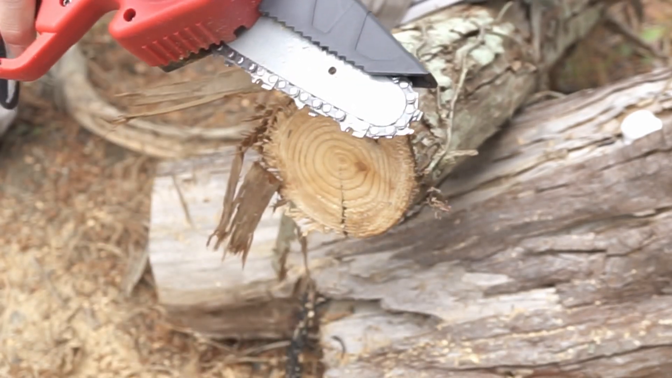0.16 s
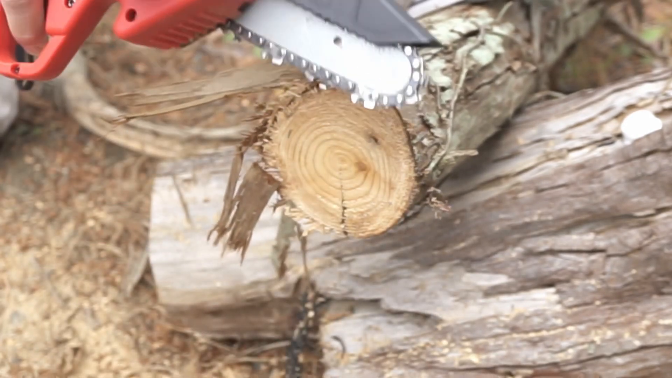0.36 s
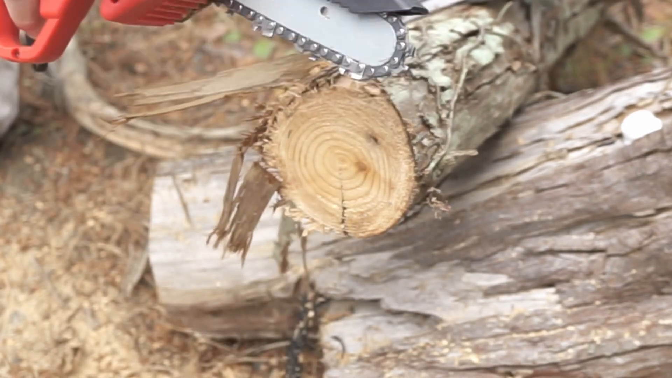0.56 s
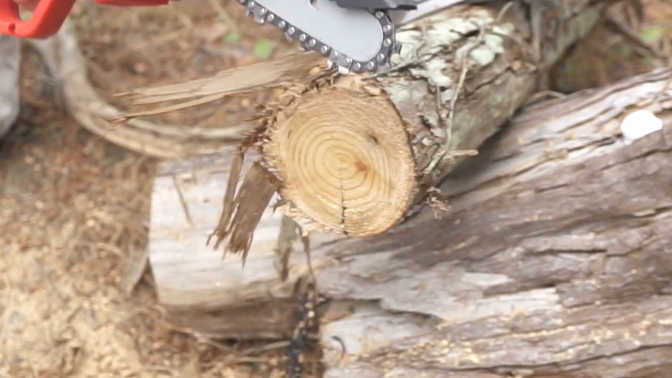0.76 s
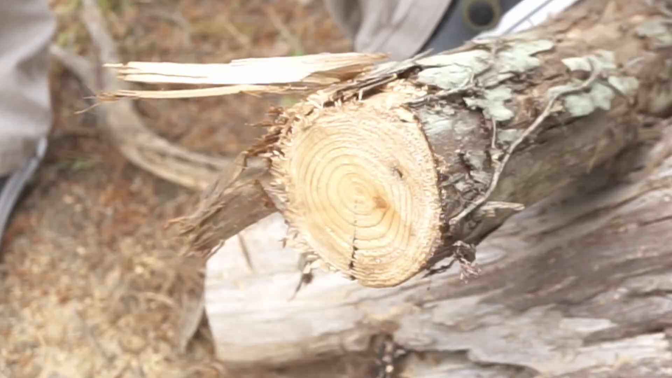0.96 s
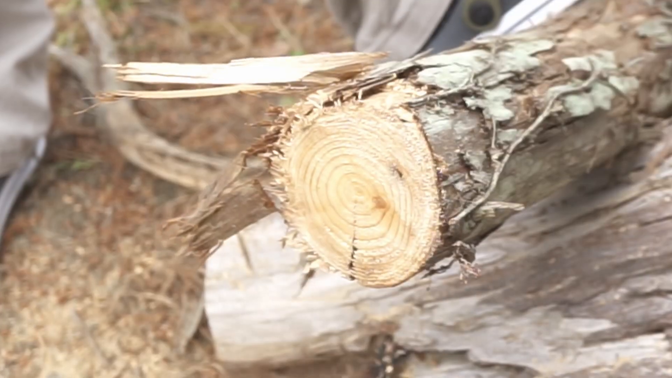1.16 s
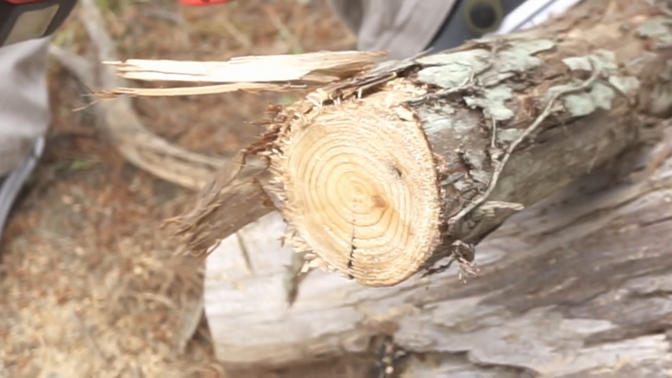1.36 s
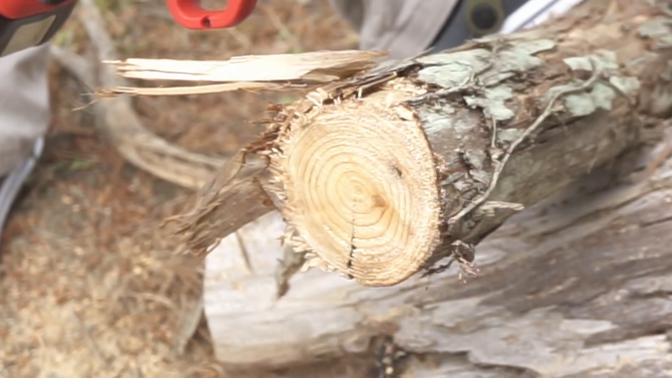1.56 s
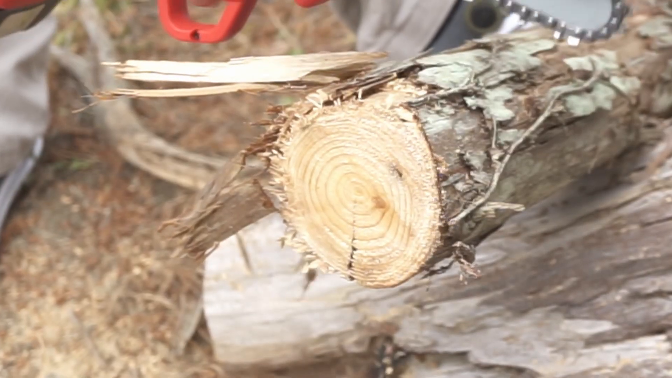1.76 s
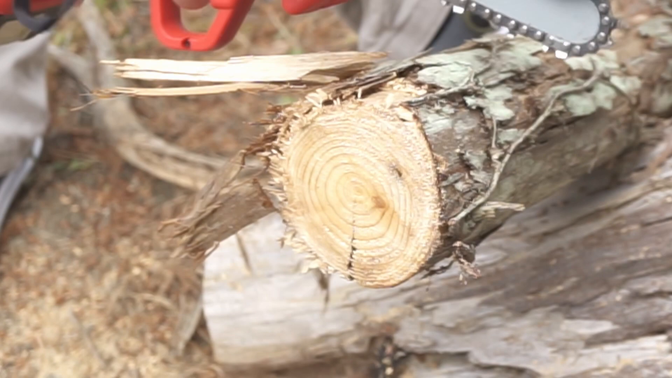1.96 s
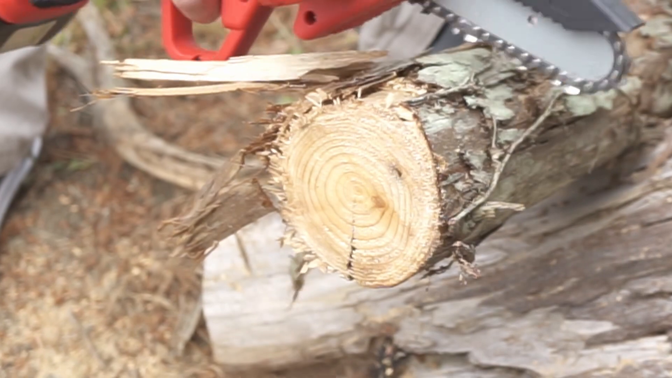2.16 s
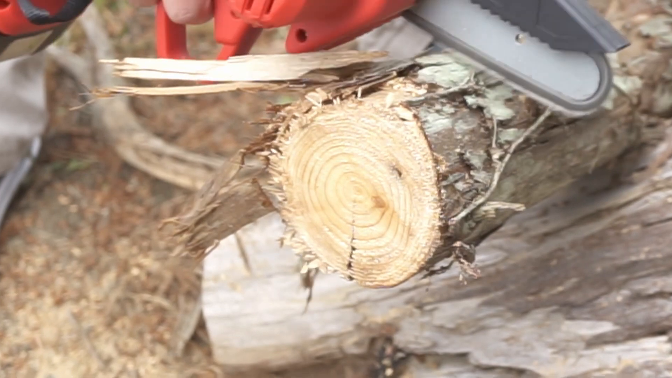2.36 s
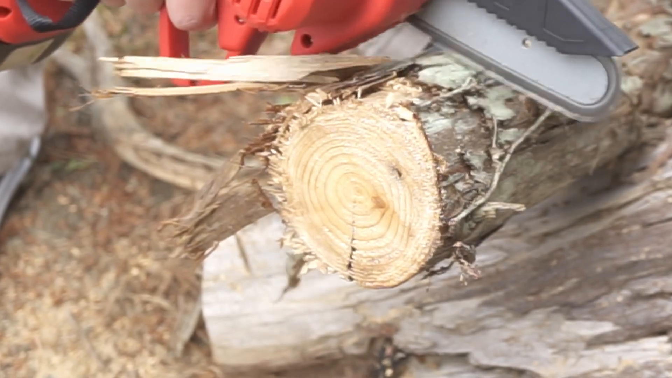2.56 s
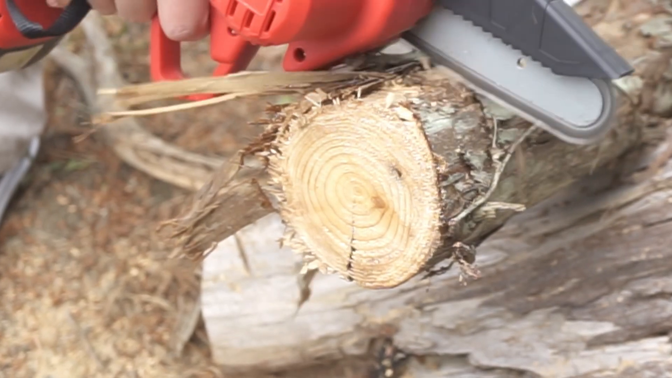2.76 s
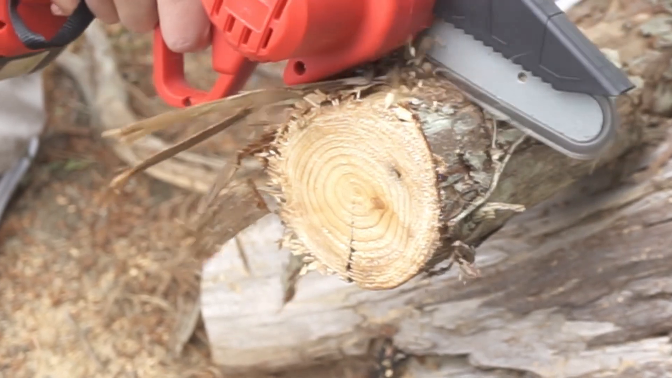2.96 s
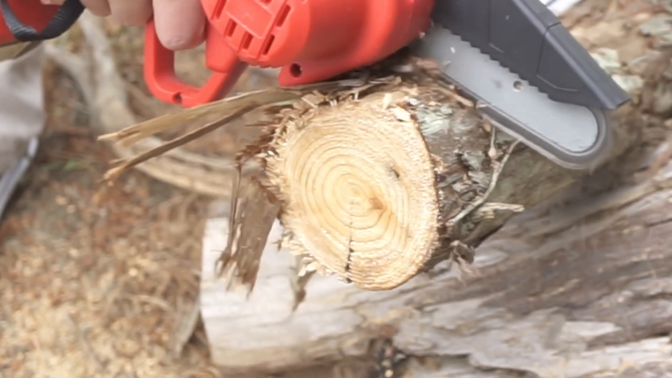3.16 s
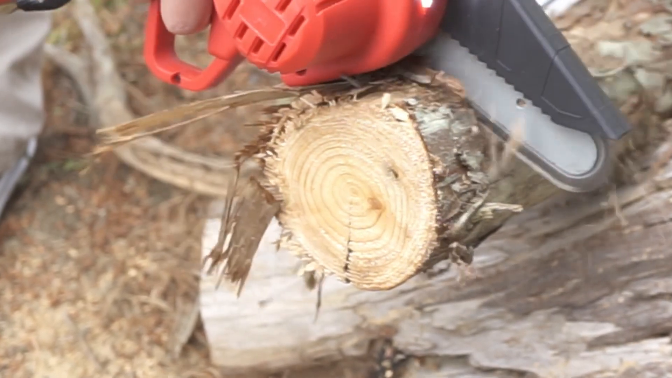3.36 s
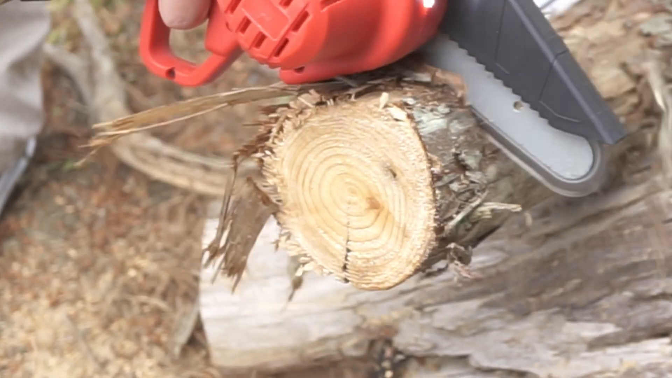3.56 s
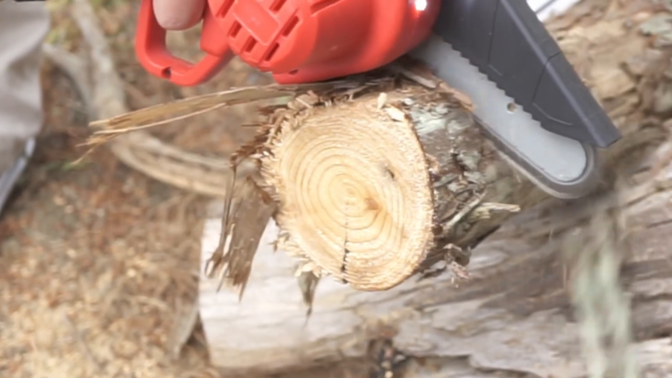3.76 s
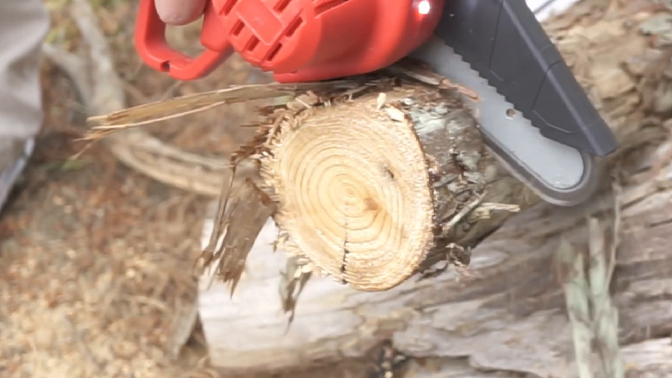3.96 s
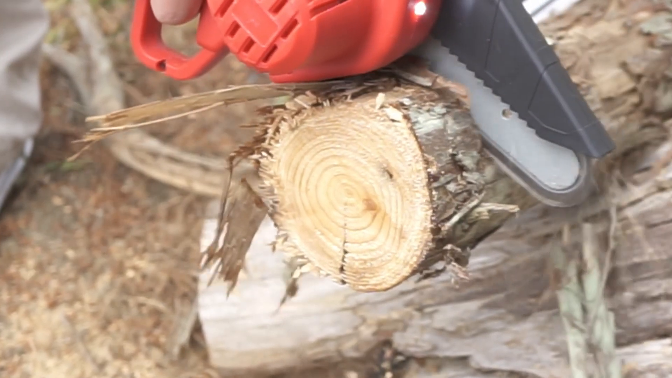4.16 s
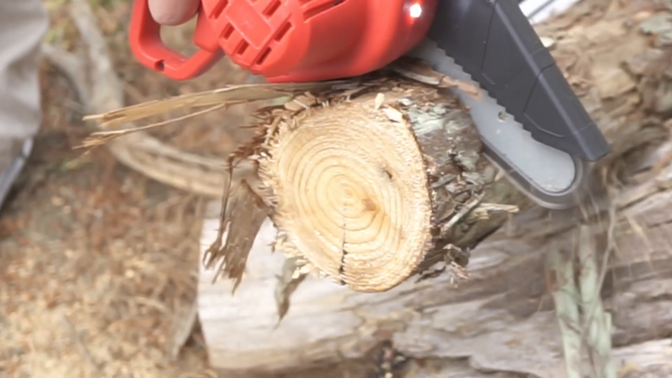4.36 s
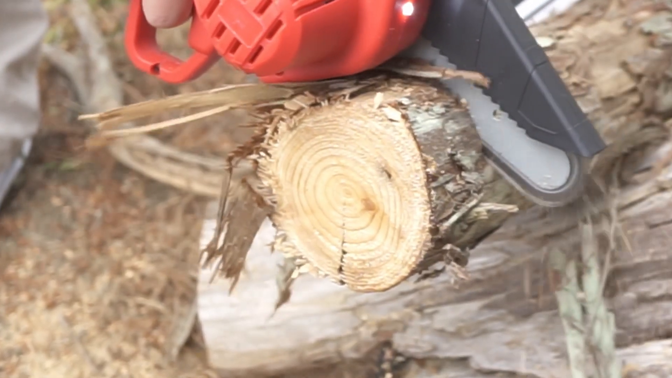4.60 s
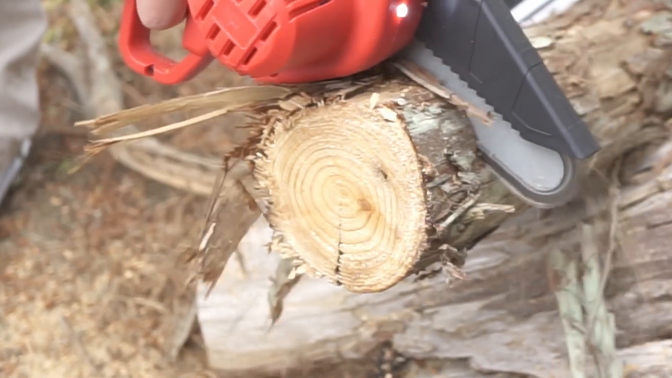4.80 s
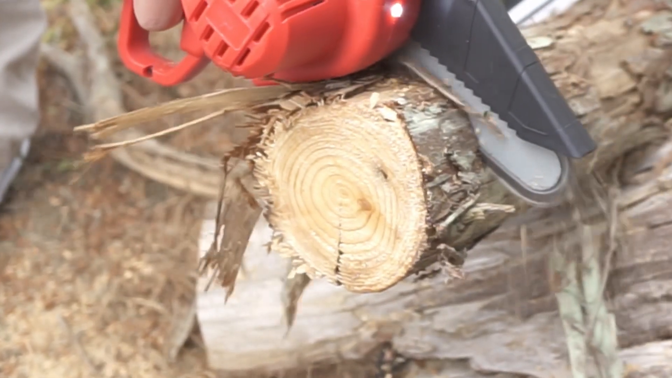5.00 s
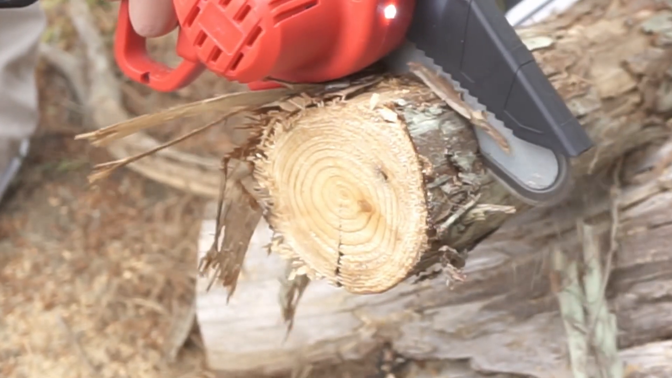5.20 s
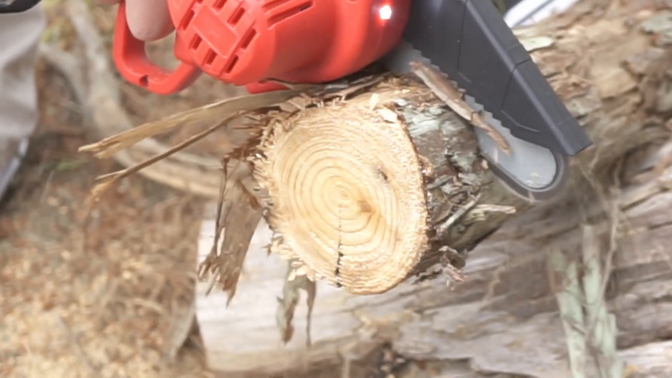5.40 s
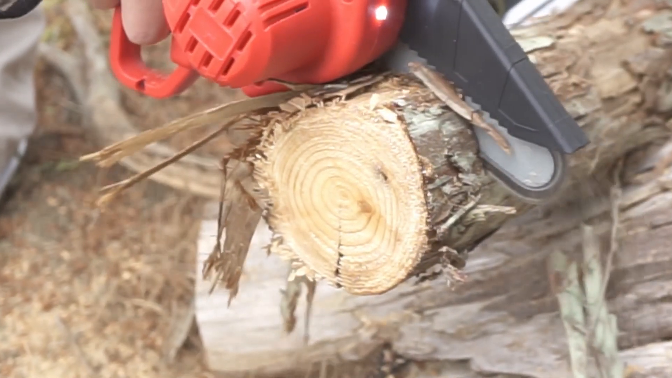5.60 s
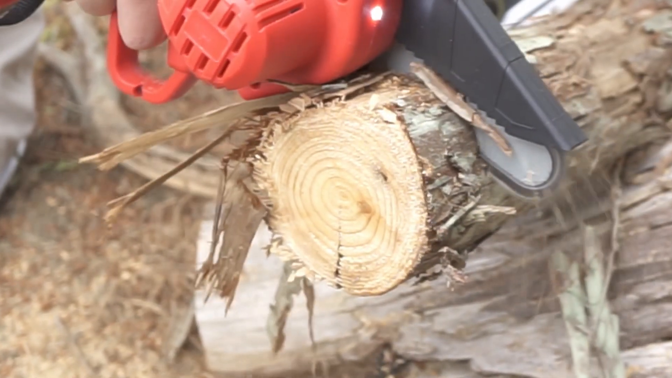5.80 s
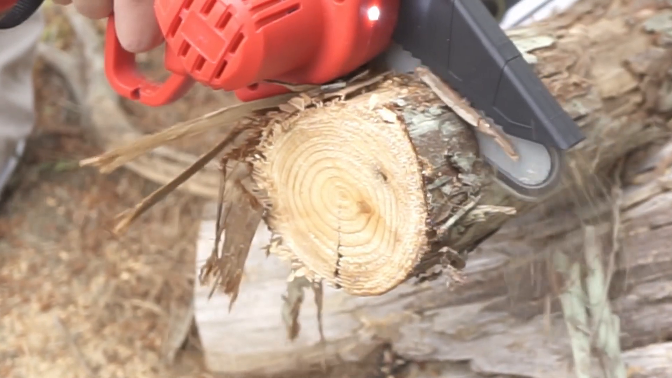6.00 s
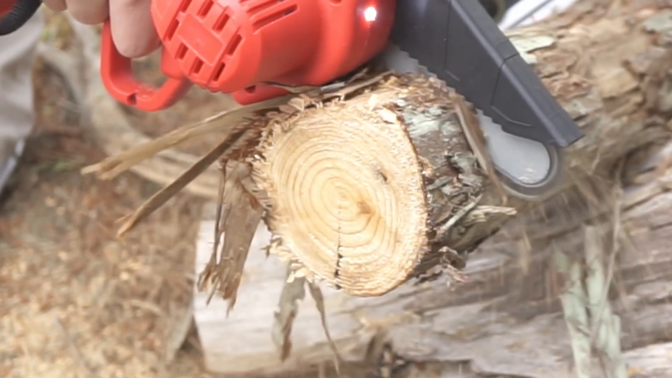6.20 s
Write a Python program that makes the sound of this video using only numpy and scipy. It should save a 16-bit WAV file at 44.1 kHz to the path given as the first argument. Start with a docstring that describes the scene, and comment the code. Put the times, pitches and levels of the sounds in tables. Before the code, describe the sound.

A small electric chainsaw, heard close in the open air, gives one short blip and after a pause runs freely with a bright chain rattle. It bounces against a log, then slows under load and rasps steadily through the wood, spraying chips and catching now and then as its steel bar rings. Gusts rumble on the microphone through the first half and ease off during the cut.

```python
"""Outdoors among trees, a small battery chainsaw is blipped once, restarted and pressed into a log.
Wind buffets the microphone and the saw is shifted in the hand between the bursts.
The chain rattles round its steel bar over the hum of motor and gears. The cutters skid on the bark;
in the wood the motor slows, the cutters tear and snag, chips spray and the bar rings in the kerf."""
import sys
import numpy as np
from scipy import signal
from scipy.fft import rfft, irfft
from scipy.io import wavfile
from scipy.ndimage import uniform_filter1d

SR = 44100
rng = np.random.default_rng(int(sys.argv[2]) if len(sys.argv) > 2 else 0)


def digitize_waveform(pressure):
    """Quantize a signal to 16-bit integers and store it at the path in sys.argv[1].

    Rows of a 2-D input are taken as channels; values are limited to [-1, 1].
    """
    field = np.atleast_2d(pressure).T
    bounded = np.clip(field, -1, 1)
    quanta = np.round(bounded * 32767).astype(np.int16)
    wavfile.write(sys.argv[1], SR, quanta)


N = 275184
TIME = np.arange(N) / SR
CUTOFF_HZ = 15720


def from_db(db):
    return 10 ** (np.asarray(db) / 20)


def unit_rms(x):
    return x / np.sqrt(np.mean(x ** 2) + 1e-20)


def curve(rows):
    return np.interp(TIME, *np.transpose(rows))


def after(s):
    return np.maximum(TIME - s, 0)


def ramp(start_s, length_s):
    return np.minimum(after(start_s) / length_s, 1)


def swell(centre_s, width_s):
    return np.exp(-((TIME - centre_s) / width_s) ** 2)


def drift(per_s):
    """Random wander, rms 1."""
    knots = rng.standard_normal(N)
    return unit_rms(np.interp(TIME * per_s, np.arange(N), knots))


def body(x, spectrum, modes=()):
    """Filter of unit power gain: a broad spectrum plus resonances."""
    size = 2 ** 14
    hz = np.maximum(np.arange(size // 2 + 1) * SR / size, 1)
    points = np.array(spectrum)
    db = np.interp(np.log(hz), np.log(points[:, 0]), points[:, 1])
    for centre_hz, width_hz, lift_db in modes:
        db = db + lift_db / (1 + (2 * (hz - centre_hz) / width_hz) ** 2)
    gain = from_db(db)
    gain = gain / np.sqrt(np.mean(gain ** 2 * (hz < CUTOFF_HZ)))
    cepstrum = irfft(np.log(gain))
    cepstrum[1:size // 2] *= 2  # minimum phase: no ring before the strike
    cepstrum[size // 2 + 1:] = 0
    return signal.fftconvolve(x, irfft(np.exp(rfft(cepstrum))))[:N]


def decay(kicks, decay_s):
    """Exponential tail on each kick."""
    return signal.lfilter([1], [1, -np.exp(-1 / (decay_s * SR))], kicks + 1e-18)


def contacts(turns, jitter, spread_db):
    """One kick per turn, uneven in timing and strength."""
    at = np.flatnonzero(np.diff(np.floor(turns)) > 0)
    chance = np.clip(rng.standard_normal((N // 100, 2))[:len(at)], -2, 2)
    late = (jitter * chance[:, 0] / np.diff(turns)[at]).astype(int)
    kicks = np.zeros(N)
    kicks[np.clip(at + late, 0, N - 1)] = from_db(spread_db * chance[:, 1])
    return kicks


def grit(per_s, spread_db):
    """Dense tiny clicks, rms 1."""
    sizes = from_db(spread_db * np.clip(rng.standard_normal(N), -2, 2)) * rng.choice([-1, 1], N)
    return unit_rms(sizes * (rng.random(N) < per_s / SR))


def bursts(events, decay_s):
    """A short noise crunch at each event."""
    out, age_s = np.zeros(N), TIME[:SR // 10]
    envelope = np.exp(-age_s / decay_s) * (1 - np.exp(-4 * age_s / decay_s))
    for s, db in events:
        at = round(s * SR)
        crunch = envelope * rng.standard_normal(len(age_s))
        out[at:at + len(age_s)] += from_db(db) * crunch[:N - at]
    return out


# wind buffets (time [s], lift [dB])
BUFFETS = [(0.92, 5), (1.11, 6.5), (1.699, 3.5), (1.85, 5), (2.489, 6.5), (2.67, 5.5), (2.82, 5),
           (3.08, 7.5), (3.21, 6), (3.45, 3)]
# wind spectra (frequency [Hz], level [dB])
GUST_SPECTRUM = [(10, -7.5), (25, 5.5), (45, -2.5), (70, -10), (100, -19), (150, -33), (220, -64.5),
                 (350, -69), (800, -77), (3000, -110)]
EDDY_SPECTRUM = [(50, -14.5), (105, 2.5), (150, -7.5), (220, -22), (350, -40), (1000, -69)]
def wind():
    """Rumble on the microphone: a breeze freshens, then one gust buffets and dies to a lull."""
    freshen_db_per_s, fall_db_per_s, lull_db = 8, 5, -39
    gust_s, hold_s = 0.836, 0.62
    breeze_db = -36 + freshen_db_per_s * TIME
    gust_db = np.maximum(-19 - fall_db_per_s * after(gust_s + hold_s), lull_db)
    arrived = ramp(gust_s, 0.04)
    buffets_db = sum(db * swell(s, width_s=0.052) for s, db in BUFFETS) + 1.5 * drift(per_s=11)
    wind_db = (1 - arrived) * breeze_db + arrived * gust_db + buffets_db
    rumble = body(rng.standard_normal(N), GUST_SPECTRUM)
    rumble /= np.sqrt(uniform_filter1d(rumble ** 2, size=SR // 10) + 1e-12)
    eddies = body(rng.standard_normal(N), EDDY_SPECTRUM)
    eddy_db = 1.74 * wind_db - 9  # strong gusts reach higher frequencies
    return from_db(wind_db) * rumble + from_db(eddy_db) * eddies


# outdoor air (time [s], level [dB])
AIR_LEVEL = [(0, -61), (.84, -61), (.88, -54.5), (2.2, -57), (6.24, -74)]
# its spectrum (frequency [Hz], level [dB])
AIR_SPECTRUM = [(100, 9), (300, 2), (500, -6), (1000, -3.5), (1500, -8.5), (2200, -18.5), (3600, -16.5),
                (5000, -25.5), (10000, -31.5), (15800, -31)]
def air():
    """Quiet, dull outdoor noise."""
    return from_db(curve(AIR_LEVEL)) * body(rng.standard_normal(N), AIR_SPECTRUM)


# grip shifts (time [s], length [s], level [dB])
RUBS = [(0, 0.04, -67.5), (0.865, 0.49, -63), (1.5, 0.2, -71), (1.858, 0.05, -56), (1.96, 0.065, -54),
        (2.064, 0.13, -62)]
# friction spectrum (frequency [Hz], level [dB])
RUB_SPECTRUM = [(200, -10.5), (1000, -2), (2500, 1.5), (4000, 0.5), (7000, -6.5), (11000, -9), (15800, -20)]
# bar and housing resonances (frequency [Hz], width [Hz], lift [dB])
BAR_MODES = [(600, 60, 2), (785, 100, 4.5), (1250, 90, 2), (1555, 120, 7.5), (1860, 90, 1.5),
             (2200, 260, 1.5), (3350, 130, 7), (3510, 100, 4.5), (3640, 80, 3), (3780, 110, 5),
             (3940, 110, 6), (4930, 220, 4.5), (5350, 230, 2.5), (6820, 220, 3)]
def hand_rubs():
    """The hand rubs on the housing."""
    attack_s, release_s = 0.012, 0.03
    grip = sum(from_db(db) * ramp(s, attack_s) * np.exp(-after(s + length_s) / release_s)
               for s, length_s, db in RUBS)
    return grip * body(grit(per_s=9500, spread_db=2.5), RUB_SPECTRUM, BAR_MODES)


# trigger and chain clicks (time [s], relative level [dB])
CLICKS = [(1.2213, -33), (1.2695, -25), (1.281, -10), (2.162, -10.5), (2.192, -6.5)]
# open chain spectrum (frequency [Hz], level [dB])
OPEN_SPECTRUM = [(150, -63), (290, -13), (390, -9), (700, -3), (1000, -3), (1400, 3), (2200, 3.5),
                 (3000, 4), (4300, 5), (5400, 0.5), (6100, 1.5), (11800, -0.5), (14000, -3.5),
                 (15800, -7.5)]
def clicks():
    """The trigger clicks and the chain jerks taut."""
    return from_db(-18.5) * body(bursts(CLICKS, decay_s=0.0076), OPEN_SPECTRUM, BAR_MODES)


# trigger pulls (press [s], release [s], spin-up [s])
PULLS = [(1.27, 1.477, 0.031), (2.166, 6.3, 0.046)]
def throttle(coast_s=0.045):
    """Share of free speed: the motor spins up on each pull and coasts down on release."""
    return sum((1 - np.exp(-after(on_s) / rise_s)) * np.exp(-after(off_s) / coast_s)
               for on_s, off_s, rise_s in PULLS)


MUFFLE_FROM_S = 3.37  # the deepening kerf muffles chain and cutters
# chain spectrum in the kerf (frequency [Hz], level [dB])
KERF_SPECTRUM = [(150, -16), (400, -10.5), (1000, -3.5), (1500, -0.5), (2400, 1.5), (3000, 1), (4400, 1),
                 (6200, -0.5), (11000, -1.5), (13000, -2.5), (14200, -6), (15800, -7)]
# chain resonances, open and in the kerf (frequency [Hz], width [Hz], lift [dB])
OPEN_MODES = [(3700, 400, 2), (7250, 200, 6), (7660, 330, 8), (8240, 170, 3.5), (10050, 380, 5),
              (12800, 300, 2)]
KERF_MODES = [(7550, 300, 1.5), (8230, 70, 4), (9200, 250, 2), (10200, 250, 3.5), (11650, 300, 3),
              (12100, 350, 3.5), (12800, 500, 2)]
def chain(links, speed, depth):
    """Links slap the sprocket, gears knock, the chain slides in its groove; the kerf damps its ring."""
    taut_speed, muffle_db_per_s = 0.83, 2
    sprocket = decay(contacts(links, jitter=0.086, spread_db=3), decay_s=0.0026)
    gears = decay(contacts(GEAR_RATIO * links, jitter=0.038, spread_db=5.5), decay_s=0.0015)
    seating = uniform_filter1d(sprocket + gears, size=60)  # links roll into contact
    sliding = grit(per_s=9000, spread_db=3.5) * from_db(0.81 * drift(per_s=140))
    slaps = unit_rms(seating * rng.standard_normal(N))
    force = unit_rms(from_db(-3.5) * slaps + sliding)
    clunk = unit_rms(signal.sosfilt(signal.butter(2, 1200, fs=SR, output="sos"), force))
    force += from_db(-6) * (1 - speed) * clunk  # slow links land softly, so duller
    level = from_db(-15.5 - muffle_db_per_s * after(MUFFLE_FROM_S))
    level *= np.minimum(speed / taut_speed, 1) ** 2.25
    in_open = body(force, OPEN_SPECTRUM, BAR_MODES + OPEN_MODES)
    in_kerf = body(force, KERF_SPECTRUM, BAR_MODES + KERF_MODES)
    return level * ((1 - depth) * in_open + depth * in_kerf)


GEAR_RATIO = 1.184  # gear knocks per link
# running tones (multiple of link or gear rate, free level [dB], loaded level [dB])
LINK_TONES = [(1, -78, -46), (2, -47, -49), (2.56, -75, -53)]
GEAR_TONES = [(1, -78, -56), (2, -42, -51), (3.2, -47, -54)]
def hum(links, depth):
    """Orders of the turning drive; load swells the lowest and makes them all shaky."""
    out, load, unrest = np.zeros(N), depth ** 2, np.sqrt(depth)
    for turns, tones in (links, LINK_TONES), (GEAR_RATIO * links, GEAR_TONES):
        for multiple, free_db, loaded_db in tones:
            level = (1 - load) * from_db(free_db) + load * from_db(loaded_db)
            level *= from_db(3.2 * unrest * np.clip(drift(per_s=28), -3, 1.5))
            shake_rad = (0.1 + 0.65 * unrest) * drift(per_s=35)
            out += np.sqrt(2) * level * np.sin(2 * np.pi * multiple * turns + shake_rad)
    return out


# cutter skids (time [s], relative level [dB])
SKIDS = [(2.808, 5), (2.8184, 5.5), (2.8254, -10), (2.841, 6), (2.8514, -12)]
# their spectrum (frequency [Hz], level [dB])
SKID_SPECTRUM = [(500, -9), (2000, -20), (4000, -10), (5800, 6), (8000, -11), (11000, 1), (15000, -17)]
def skids():
    """Cutters skid on the bark."""
    return from_db(-9.5) * body(bursts(SKIDS, decay_s=0.002), SKID_SPECTRUM)


TOUCH_S, BITE_RISE_S = 2.81, 0.49
# spectra of torn wood, pinched bar, bar on log, chips (frequency [Hz], level [dB])
WOOD_SPECTRUM = [(90, -28), (130, -35), (170, -4), (240, -6), (340, 0), (600, 0.5), (780, 0), (950, 0),
                 (1300, 6.5), (1900, 0.5), (2400, 1.5), (4000, -3.5), (8000, -12.5), (15000, -23)]
RING_SPECTRUM = [(1000, -51.5), (2400, -17.5), (2900, -9), (3250, -0.5), (3450, -4.5), (3700, -2.5),
                 (3950, -3.5), (4300, -65), (5000, -14), (5600, -21.5), (9000, -57)]
KNOCK_SPECTRUM = [(100, -3), (220, -5), (330, 7), (470, 5), (600, -1), (1000, 6.5), (1500, 8), (3000, -18),
                  (8000, -30), (15000, -36)]
SPRAY_SPECTRUM = [(5000, -35), (9000, -3), (12200, 1), (15800, -8)]
def cutting(links):
    """Cutters tear fibres and throw chips; the bar judders, then rings most as the kerf pinches it."""
    muffle_db_per_s = 3
    kicks = contacts(links / 2, jitter=0.11, spread_db=2.6)  # a cutter on every second link
    strikes = unit_rms(decay(kicks, decay_s=0.003))
    tearing = unit_rms((0.5 + strikes) * grit(per_s=9000, spread_db=0))
    wood_db = -25 - muffle_db_per_s * after(MUFFLE_FROM_S)
    wood = from_db(wood_db) * body(tearing, WOOD_SPECTRUM, BAR_MODES)
    friction = unit_rms((1.23 + strikes) * rng.standard_normal(N))  # steadier than tearing
    pinch_db = 9 * swell(5.13, width_s=0.53)
    ring = from_db(-29.4 + pinch_db) * body(friction, RING_SPECTRUM)
    bounces = body(strikes * rng.standard_normal(N), KNOCK_SPECTRUM)
    judder = from_db(-34.5) * swell(3.24, width_s=0.26) * bounces
    chips = body(grit(per_s=3000, spread_db=4), SPRAY_SPECTRUM)
    spray = from_db(-25) * swell(3.38, width_s=0.71) * chips
    bite = ramp(TOUCH_S, BITE_RISE_S)
    return bite * wood + np.sqrt(bite) * (ring + judder + spray)


# bar bounces (time [s], relative level [dB])
KNOCKS = [(2.893, -16.5), (2.912, -22.5), (3.004, -20), (3.033, -17), (3.059, -19), (3.074, -19),
          (3.135, -27), (3.264, -18), (3.308, -18.5)]
def knocks():
    """The bar bounces on the log before the kerf holds it."""
    return from_db(7) * body(bursts(KNOCKS, decay_s=0.0033), KNOCK_SPECTRUM)


# hard catches (time [s], relative level [dB])
SNAGS = [(2.9362, -7), (3.5118, -6.5), (3.7883, -3), (4.1545, -4.5), (4.2643, -2), (4.3415, -4),
         (4.3937, -5), (4.4722, -1), (4.572, -2.5), (4.6354, 0.5), (4.9452, -4), (4.9727, -5), (5.0608, 2),
         (5.241, -5.5), (5.2528, -3.5), (5.5774, -2), (5.6364, -5), (6.0249, -6)]
# their spectrum (frequency [Hz], level [dB])
SNAG_SPECTRUM = [(100, -18), (400, -14.5), (800, -14), (1400, -4.5), (2400, -1.5), (3200, 3.5), (4500, -6),
                 (8000, -16), (15000, -18)]
def snags(catches_per_s=6):
    """Single cutters catch hard in the wood; lighter catches come at random after full bite."""
    catch_s = TIME[(rng.random(N) < catches_per_s / SR) & (TIME > TOUCH_S + BITE_RISE_S)]
    catch_db = -11 + 4 * rng.standard_normal(200)
    events = list(SNAGS) + list(zip(catch_s, catch_db))
    return from_db(-1.5) * body(bursts(events, decay_s=0.0024), SNAG_SPECTRUM, BAR_MODES)


def tree_echo(x, t60_s, level_db, dull_hz):
    """Faint scatter from the trees; its treble dies first."""
    scatter = rng.standard_normal(SR)
    low = signal.sosfilt(signal.butter(1, dull_hz, fs=SR, output="sos"), scatter)
    fall_db = -60 * TIME[:SR] / t60_s
    tail = low * from_db(fall_db) + (scatter - low) * from_db(fall_db / 0.37)
    return from_db(level_db) * signal.fftconvolve(x, tail / np.linalg.norm(tail))[:N]


# bar sunk in the log (time [s], depth [0-1])
BAR_DEPTH = [(2.75, 0.25), (2.95, 0.56), (3.3, 0.96), (4.2, 0.91), (6.24, 0.92)]
def scene():
    """The trigger spins the motor up, the wood drags it down; its speed drives chain, cutters and hum."""
    free_links_per_s, sag_links_per_s, wander_links_per_s = 206, 37, 2.5
    depth, drive = curve(BAR_DEPTH), throttle()
    drag = depth ** 2 * (sag_links_per_s + wander_links_per_s * drift(per_s=4))
    speed = drive * (1 - drag / free_links_per_s)
    links = np.cumsum(free_links_per_s * speed) / SR
    motor = drive ** 12 * hum(links, depth)  # tones stand out only near full throttle
    saw = motor + chain(links, speed, depth) + cutting(links)
    saw += skids() + knocks() + snags() + clicks() + hand_rubs()
    echo = tree_echo(saw, t60_s=0.88, level_db=-29, dull_hz=2500)
    return (saw + echo + wind() + air())[None]


def record(dry):
    """Clip just under full scale, then low-pass steeply."""
    lowpass = signal.ellip(12, 0.1, 80, CUTOFF_HZ, fs=SR, output="sos")
    return signal.sosfilt(lowpass, np.clip(dry, -0.9, 0.9))


dry = scene()
out = record(dry)
digitize_waveform(out)
```